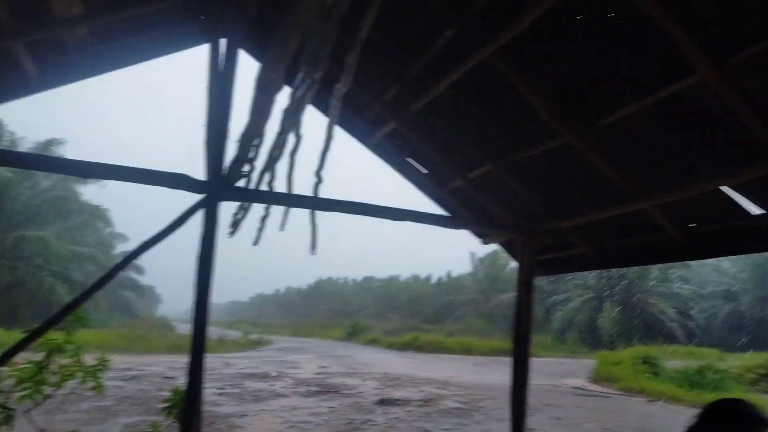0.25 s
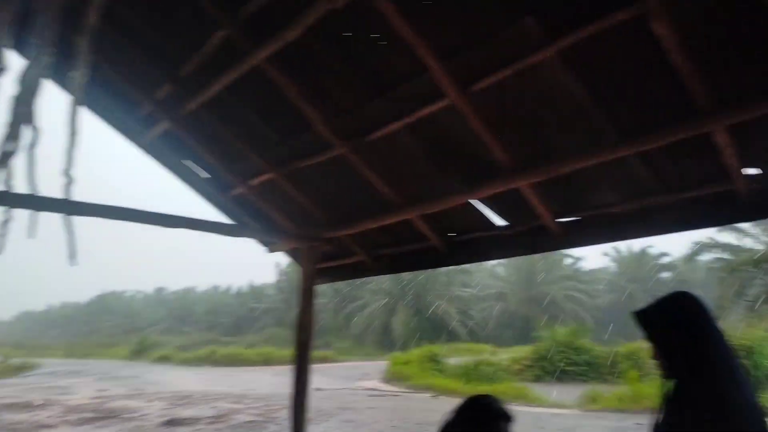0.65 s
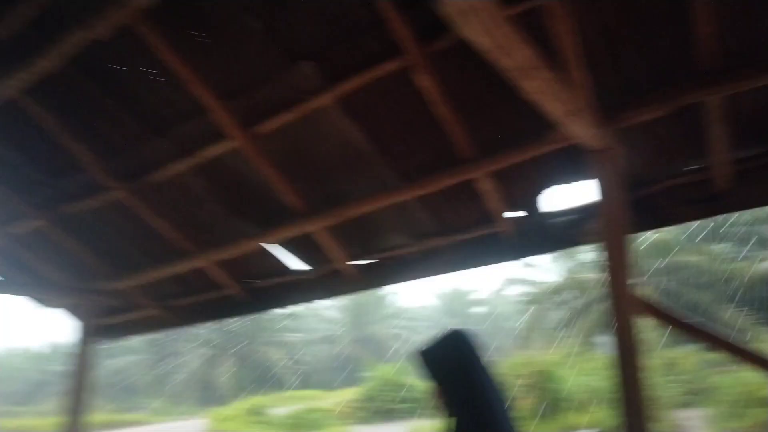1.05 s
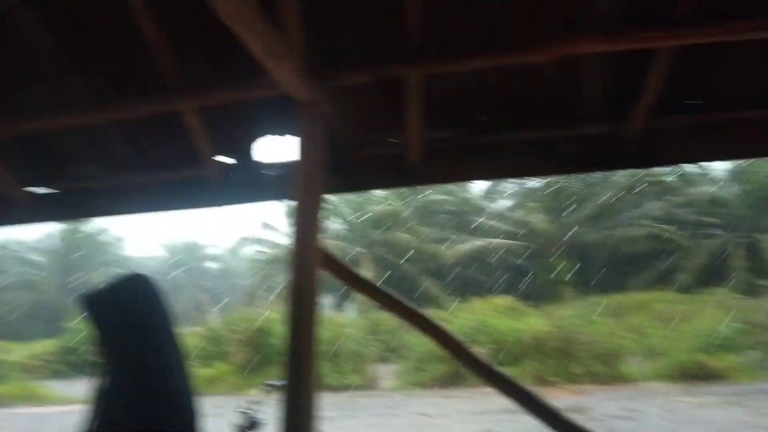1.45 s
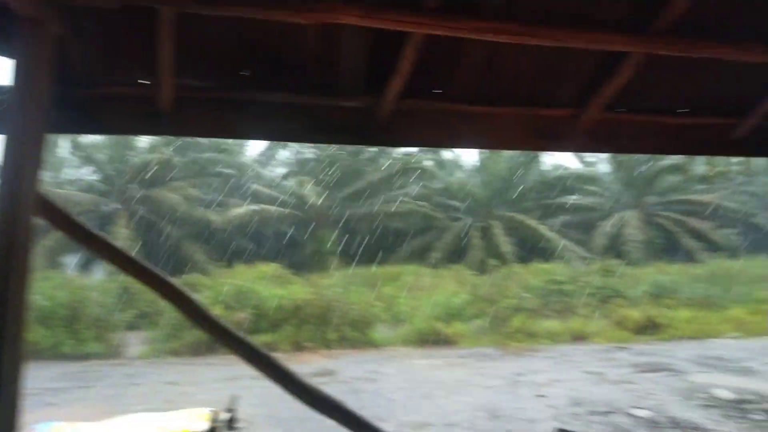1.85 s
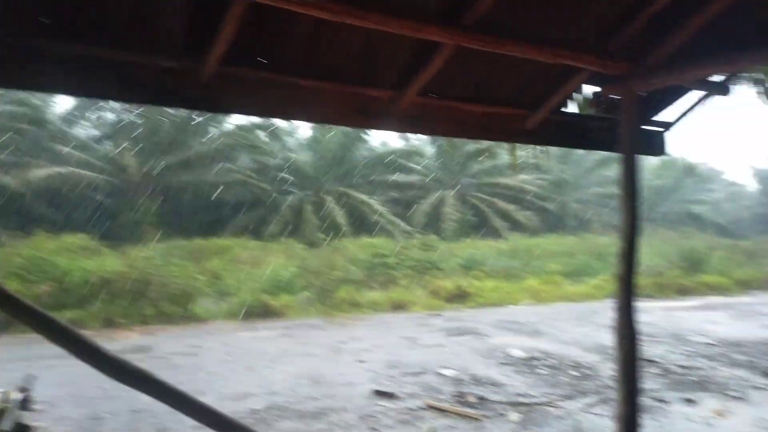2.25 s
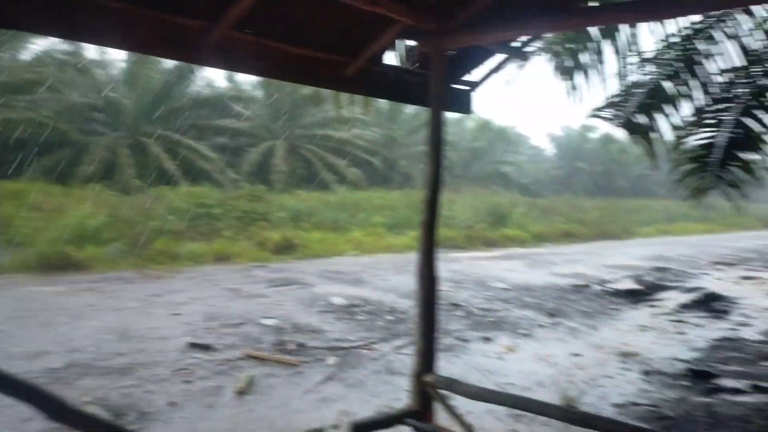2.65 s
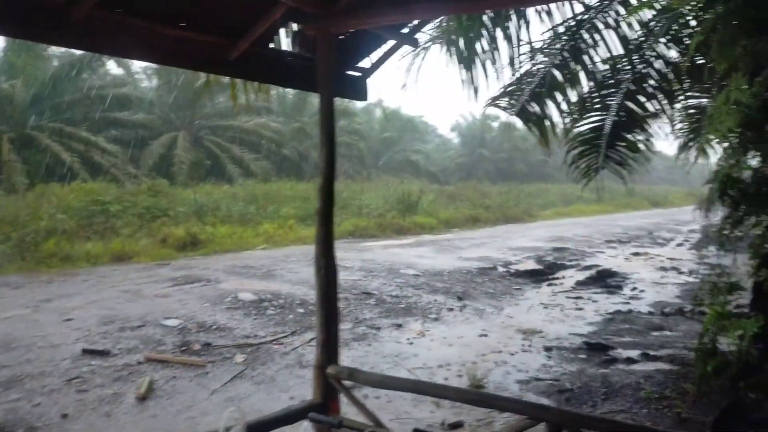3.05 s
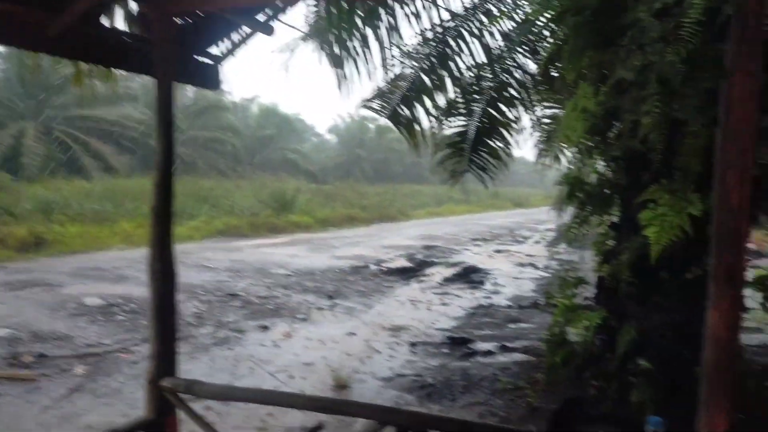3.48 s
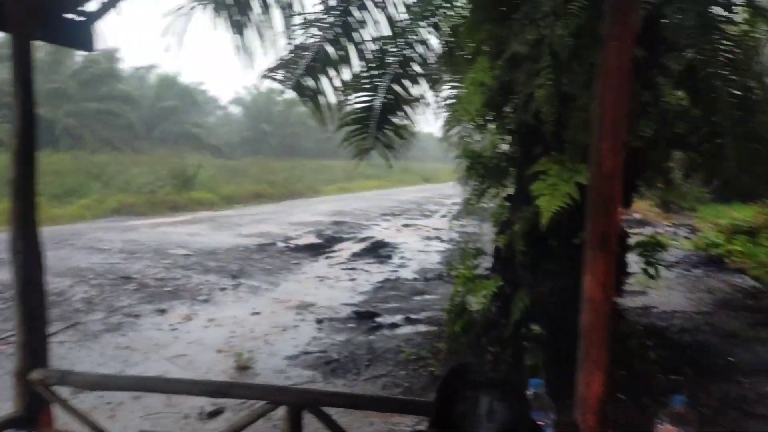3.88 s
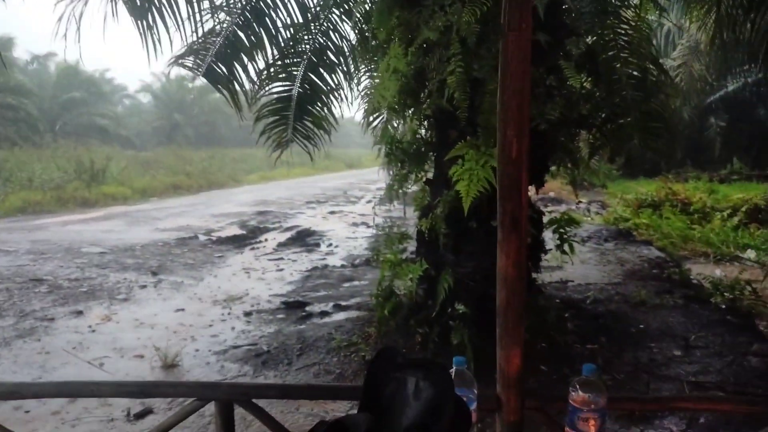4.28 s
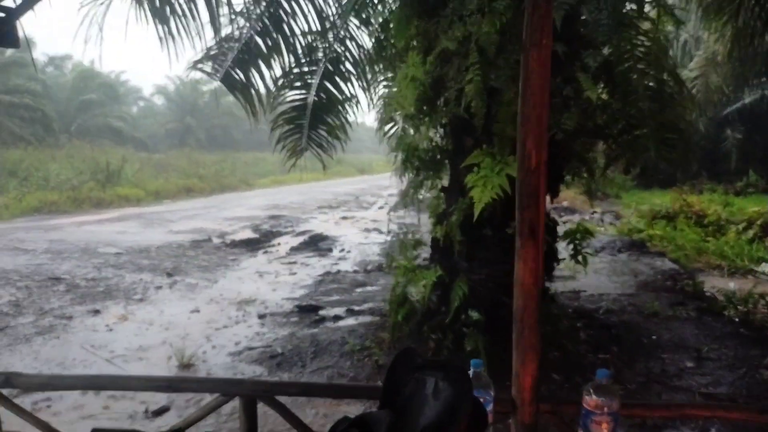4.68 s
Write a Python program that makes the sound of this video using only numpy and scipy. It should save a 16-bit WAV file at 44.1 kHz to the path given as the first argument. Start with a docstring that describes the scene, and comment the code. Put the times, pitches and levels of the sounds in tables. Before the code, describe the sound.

Constant heavy rain fills the scene from start to end: a broad roar from palm fronds and muddy road beneath a crisp, bright hiss of fine splashes. Close drops slap down from the shelter's eaves, clustering between about one and two seconds, with two nearly simultaneous hard ones near 4.4 seconds. Faint low puffs of air brush the microphone. Outdoors under an open roof, centred like mono, with a slightly sharp treble ring.

```python
"""Heavy tropical rain on a plantation road, heard from under an open shelter: noise roars and hisses throughout.
From 0.5 s big drops splash off the eaves, crowding between 1.2 and 2.1 s, while puffs of air rumble on the
microphone, the strongest at 2.2 s; the rain itself strengthens near 1.6 s and eases by 2.8 s.
Lone splashes follow, then two hard ones at 4.4 s as the rain is strongest. Lesser drips fall at random.
Shaped noise makes rain and air, decaying sines the patter, noise bursts the splashes; the port rings in the treble."""
import sys
import numpy as np
from scipy import signal
from scipy.fft import rfft, irfft, next_fast_len
from scipy.io import wavfile
from scipy.ndimage import uniform_filter1d, map_coordinates

SR = 44100
rng = np.random.default_rng(int(sys.argv[2]) if len(sys.argv) > 2 else 0)


def to_wav(s):
    """Save 16-bit WAV."""
    ch = np.atleast_2d(s).T  # columns
    pcm = np.round(np.clip(ch, -1, 1) * 32767)  # PCM
    wavfile.write(sys.argv[1], SR, pcm.astype(np.int16))


N = 212692  # length in samples

# Strength of the rain: [t/s, relative level of the roar/dB, relative level of the splashing hiss/dB]
RAIN_STRENGTH = [(0.0, -34, -27.5), (0.95, -34.5, -28), (1.57, -31, -27), (2.76, -33, -28),
                 (3.56, -32.5, -27.5), (4.43, -30.5, -25.5), (4.82, -30.5, -26.5)]
# Rain on distant fronds and road, relative spectrum: [f/Hz, level per Hz/dB]
ROAR_SPECTRUM = [(40, -25), (110, -18), (220, -11.5), (275, -6.5), (600, -8.5), (800, -4), (1130, -5),
                 (1350, -1), (1950, .5), (2550, -1), (3150, -5), (4300, -7), (5200, -13), (9000, -16)]
# The roof's lowest mode: (f/Hz, width/Hz, level of the ringing relative to its drive/dB)
ROOF_MODE = (143.5, 32, 5.1)
# Tiny splashes on wet ground, relative spectrum: [f/Hz, level per Hz/dB]
FIZZ_SPECTRUM = [(1000, -31), (3500, -7), (5200, -6), (6500, 0), (8000, 2), (10000, 0.5), (12000, -1.5),
                 (14300, 3), (15600, 2)]
# Big drops off the eaves: [t/s, relative level of the splash/dB, fine spray against that splash/dB]
EAVE_DROPS = [(.531, -20.5, 0), (.811, -29, 9), (1.172, -24, 4), (1.242, -31, 10.5), (1.378, -25, 5),
              (1.518, -15, -9), (1.677, -23.5, 4), (1.782, -28, 12), (1.950, -17.5, -1), (1.958, -18, -4),
              (2.057, -19, -11), (2.787, -27, 7), (3.611, -28, 8), (4.393, -15, -12), (4.399, -14, -15)]
# Puffs of air on the microphone: [t/s, peak level/dB, dying time/s]
AIR_PUFFS = [(.75, -52, .25), (.9, -48, .12), (1.0, -48, .15), (1.21, -45, 0.11), (1.32, -48, .4),
             (2.03, -55, .4), (2.245, -41, .15), (3.03, -48, .22), (3.95, -52, .35)]
# Rumble of the puffs, relative spectrum: [f/Hz, level per Hz/dB]
RUMBLE_SPECTRUM = [(10, -22), (25, 0.5), (45, -5), (80, -6.5), (200, -22), (600, -70)]
# Slow sway of pressure, relative spectrum: [f/Hz, level per Hz/dB]
SWAY_SPECTRUM = [(2, -37), (4, -7), (8, 4), (20, -18), (60, -72)]
# The microphone port: (f/Hz, width/Hz, level of the ringing relative to its drive/dB)
PORT_MODE = (8070, 1440, 11.92)

# Lesser drips: middle of the splash level, middle of the spray against it, and spread either way
SMALL_DRIP_DB, SMALL_SPRAY_DB, SMALL_SPREAD_DB = -23.5, -4, 6
# A puff builds by this many dB in the rise time and loses them in its dying time
PUFF_RISE_S, PUFF_FALL_DB = 0.064, 22
CALM_DB = -58.5  # rumble of the air between puffs
TOP_HZ = 15750  # upper band limit


def downpour():
    """Superposition: far roar, resonant roof and nearer patter add, and follow the strength of the rain."""
    roar_db, _ = curves(RAIN_STRENGTH)
    far = resonate(coloured(wash(patchy_db=0.37), ROAR_SPECTRUM), ROOF_MODE)
    patter = plops(count=5000, pitch_hz=1953, octaves=0.503, cycles=2.56, spread_db=2.5)

    # the deep part of the roar gathers from all around, so it swells less
    deep = filtered(far, lambda hz: 1 / (1 + (hz / 900) ** 4))
    mean_db = np.mean(roar_db)
    deep_db = mean_db + 0.59 * (roar_db - mean_db)

    upper = far - deep + amp(-9.0) * patter
    return amp(deep_db + 0.25) * deep + amp(roar_db + 0.54) * upper


def splashing():
    """Shot noise: small drops burst on the wet ground in flurries, over a smoother hiss."""
    _, hiss_db = curves(RAIN_STRENGTH)
    flurry = amp(0.6 * wobble(16) + 0.9 * wobble(55))
    spatter = flurry * impacts(count=10000, spread_db=2.5, burst_t60=0.0063)
    fizz = coloured(wash(patchy_db=0.9) + amp(-4) * spatter, FIZZ_SPECTRUM)
    return amp(hiss_db - 5.5) * fizz


def eave_drips(scatter_t60=0.086, scatter_db=-11, grain_db=3):
    """Impact and break-up: each drop slaps the ground, then its droplets scatter in a longer decay."""
    t = np.arange(SR // 8) / SR
    slap_envelope = amp(-60 * t / 0.009) * (1 - np.exp(-t / 0.0003))
    scatter_envelope = amp(scatter_db - 60 * t / scatter_t60)
    splash, spray = np.zeros((2, N + len(t)))

    for s, db, spray_db in [*EAVE_DROPS, *small_drips(count=20)]:
        slap, droplets, sizes = rng.standard_normal((3, 2, len(t)))
        droplets = unit(amp(grain_db * sizes) * droplets)  # uneven sizes make it grainy
        coarse, fine = slap_envelope * slap + scatter_envelope * droplets
        start = round(s * SR)
        splash[start:][:len(t)] += amp(db) * coarse
        spray[start:][:len(t)] += amp(db + spray_db) * fine

    # the splash is treble; the finest spray lies above it
    splash_band = signal.butter(2, [6700, 10200], "bandpass", fs=SR, output="sos")
    spray_band = signal.butter(2, 11500, "highpass", fs=SR, output="sos")
    splash = signal.sosfilt(splash_band, splash[:N])
    spray = signal.sosfilt(spray_band, spray[:N])
    return amp(-1.0) * splash + amp(4.5) * spray


def small_drips(count):
    """Random arrivals: rows like those of the big drops, uniform in time, level and fineness."""
    when, size, fineness = rng.random((count, 3)).T
    splash_db = SMALL_DRIP_DB + SMALL_SPREAD_DB * (2 * size - 1)
    spray_db = SMALL_SPRAY_DB + SMALL_SPREAD_DB * (2 * fineness - 1)
    return np.column_stack([when * (N - 1) / SR, splash_db, spray_db])


def draught():
    """Pressure fluctuation of moving air: puffs of low rumble build fast and die away over a slow sway."""
    t = np.arange(N) / SR
    power = amp(CALM_DB) ** 2
    for s, db, dying_s in AIR_PUFFS:
        away = np.maximum((s - t) / PUFF_RISE_S, (t - s) / dying_s)
        power = power + amp(db - PUFF_FALL_DB * away) ** 2
    rumble = coloured(rng.standard_normal(N), RUMBLE_SPECTRUM)
    sway = coloured(rng.standard_normal(N), SWAY_SPECTRUM)
    return np.sqrt(power) * rumble + amp(-46.0) * sway


def wash(patchy_db):
    """Central limit: countless drops merge into noise, here swelling in patches of time and pitch."""
    z = signal.stft(rng.standard_normal(N), nperseg=512)[2]
    field = uniform_filter1d(rng.standard_normal(z.shape), size=7, axis=0)  # smooth in pitch
    field = uniform_filter1d(field, size=16, axis=1)  # smooth in time
    return unit(signal.istft(z * amp(patchy_db * unit(field)), nperseg=512)[1][:N])


def plops(count, pitch_hz, octaves, cycles, spread_db):
    """Damped oscillation: each drop rings at its own pitch, falling to 1/e in a few cycles."""
    t = np.arange(400) / SR
    start = rng.integers(0, N, (count, 1))
    hz = pitch_hz * 2 ** (octaves * rng.standard_normal((count, 1)))
    hz = np.minimum(hz, TOP_HZ)
    size = amp(spread_db * np.minimum(rng.exponential(size=(count, 1)), 5))
    rings = size * np.sin(2 * np.pi * hz * t) * np.exp(-hz * t / cycles)
    places = start + np.arange(len(t))
    return unit(np.bincount(places.ravel(), rings.ravel(), N)[:N])


def impacts(count, spread_db, burst_t60):
    """Incoherent addition: tiny noise bursts at random moments add in power, a few much nearer."""
    when, size = rng.random((count, 2)).T
    nearness = np.minimum(-np.log(1 - size), 5)  # exponential, capped
    energy = np.bincount((when * N).astype(int), amp(spread_db * nearness) ** 2, N)
    t = np.arange(SR // 20) / SR
    decay = amp(-60 * t / burst_t60) ** 2  # each starts at once and dies away
    power = np.abs(signal.fftconvolve(energy, decay)[:N])
    return unit(np.sqrt(power) * rng.standard_normal(N))


def resonate(x, mode):
    """Driven resonance: x plus the ringing of one damped mode."""
    hz, width, db = mode
    return filtered(x, lambda f: 1 + amp(db) * 1j * f * width / (hz * hz - f * f + 1j * f * width))


def coloured(x, spectrum):
    """Spectral shaping: x through a curve of (f/Hz, level/dB) points, at rms 1."""
    hz, db = np.transpose(spectrum)
    return unit(filtered(x, lambda f: amp(np.interp(np.log(f + 1), np.log(hz), db))))


def filtered(x, response):
    """Linear filtering: the spectrum of x times a complex response of frequency."""
    m = next_fast_len(N + 8192)
    return irfft(rfft(x, m) * response(np.fft.rfftfreq(m, 1 / SR)), m)[:N]


def wobble(rate):
    """Interpolation: a smooth random curve through `rate` knots a second."""
    return map_coordinates(rng.standard_normal(int(N * rate / SR) + 4), [np.arange(N) * rate / SR])


def curves(rows):
    """Linear interpolation: one value per sample for each column after the time."""
    s, *cols = np.transpose(rows)
    return [np.interp(np.arange(N) / SR, s, c) for c in cols]


def unit(x):
    """Normalisation: x at rms 1."""
    return x / np.sqrt(np.mean(x ** 2) + 1e-20)


def amp(db):
    """Logarithmic level: decibels to amplitude gain."""
    return 10 ** (np.asarray(db) / 20)


def scene():
    """Superposition at one point: everything reaches one microphone, so both channels are alike."""
    mono = downpour() + splashing() + eave_drips() + draught()
    return np.array([mono, mono])


def record(dry):
    """Resonance and band limit: the port rings, and nothing passes from TOP_HZ upward."""
    return np.array([filtered(resonate(channel, PORT_MODE), lambda hz: hz < TOP_HZ) for channel in dry])


dry = scene()
out = record(dry)
to_wav(out)
```